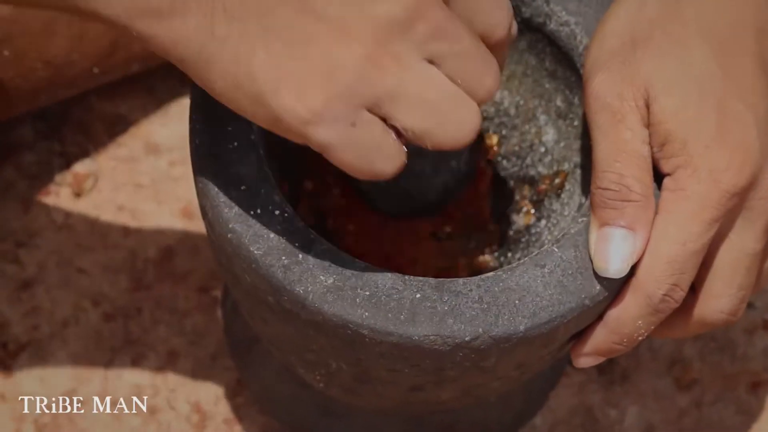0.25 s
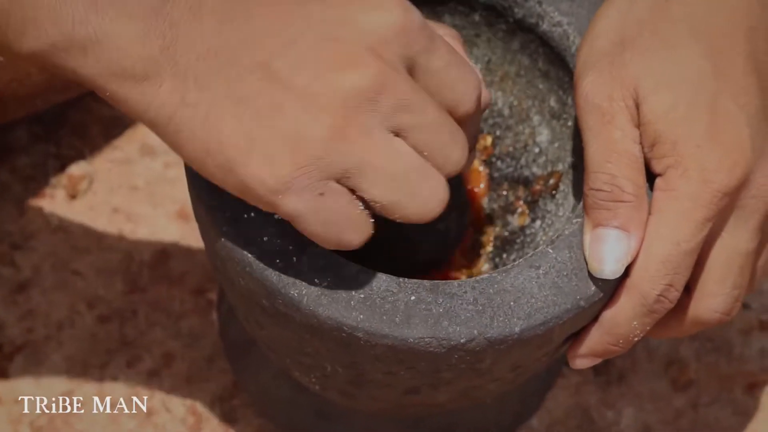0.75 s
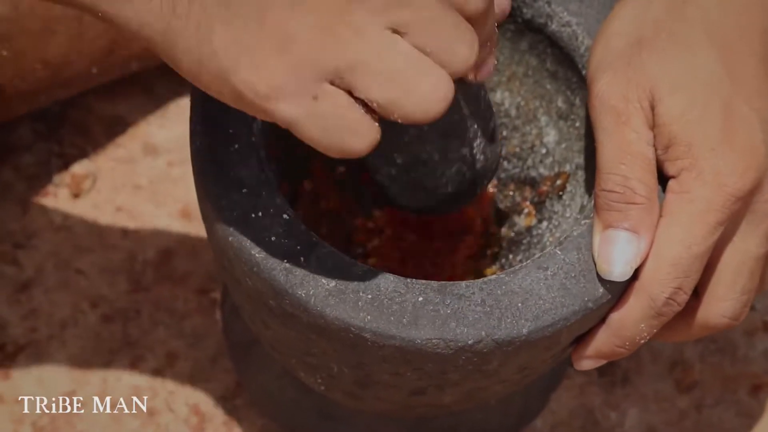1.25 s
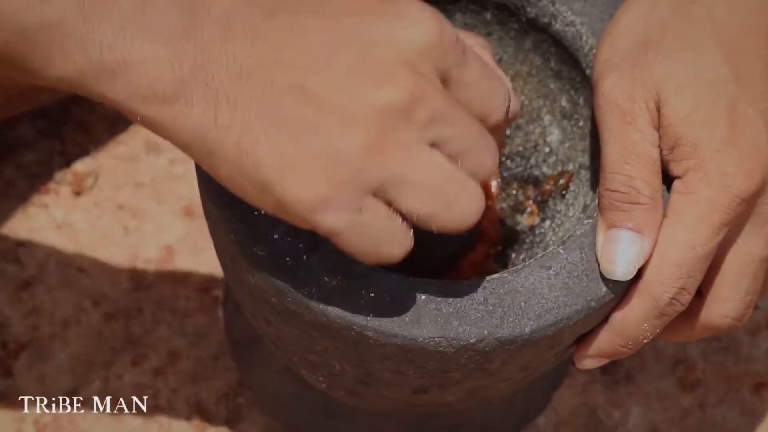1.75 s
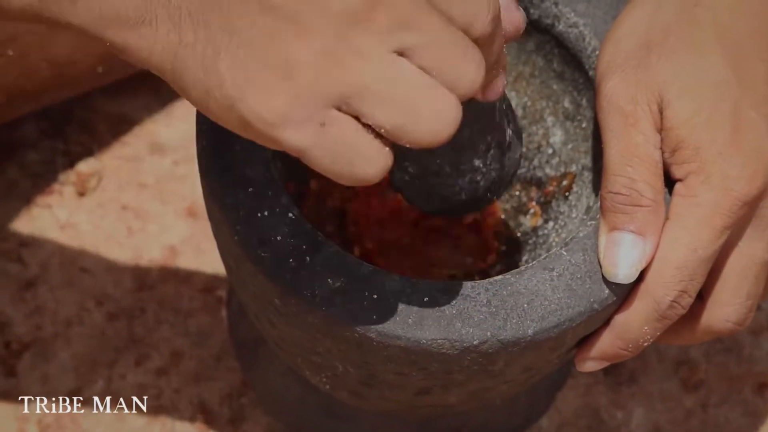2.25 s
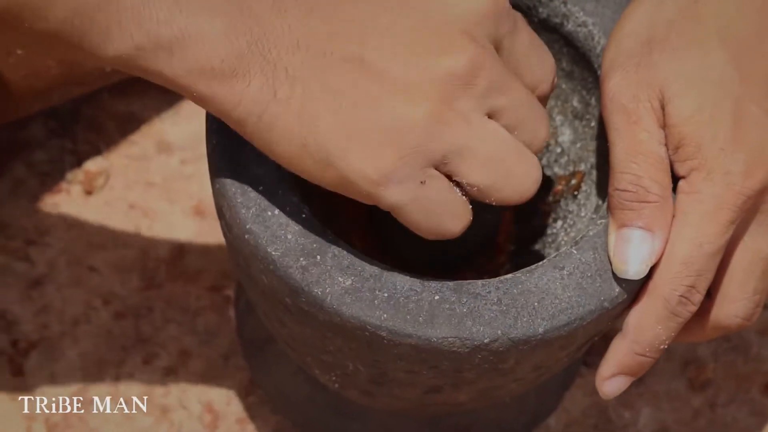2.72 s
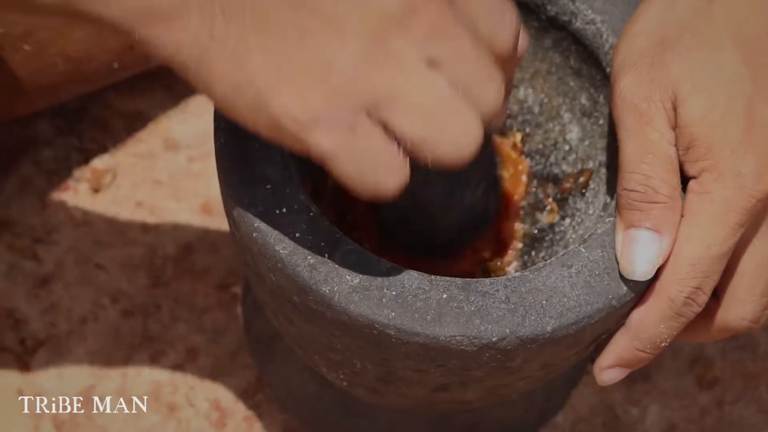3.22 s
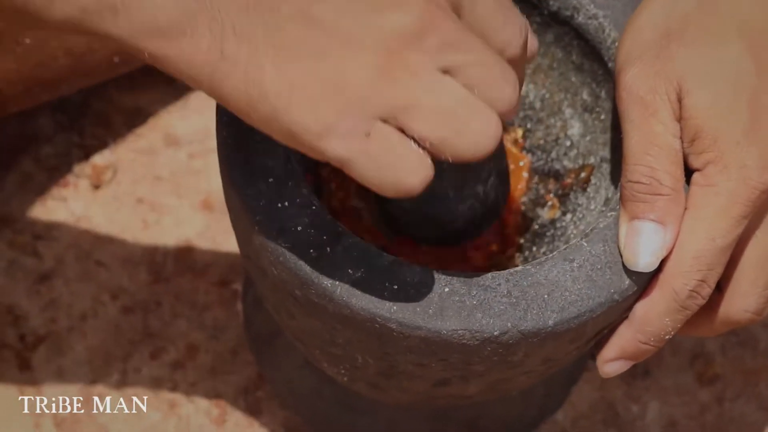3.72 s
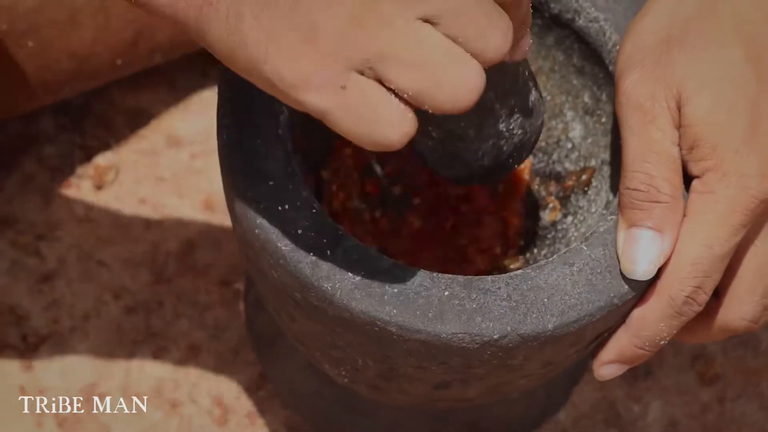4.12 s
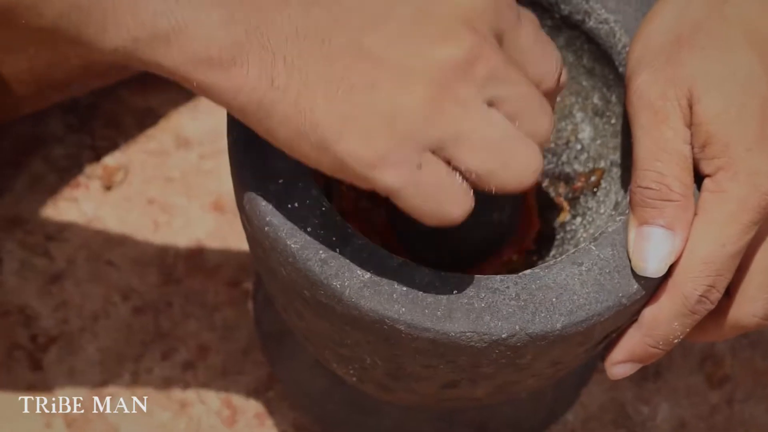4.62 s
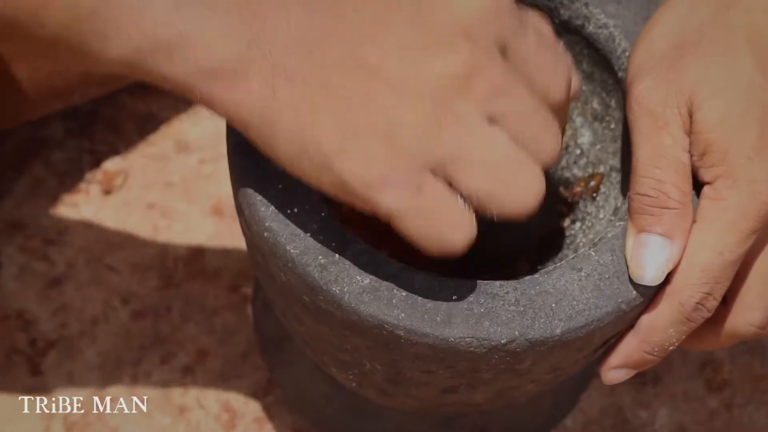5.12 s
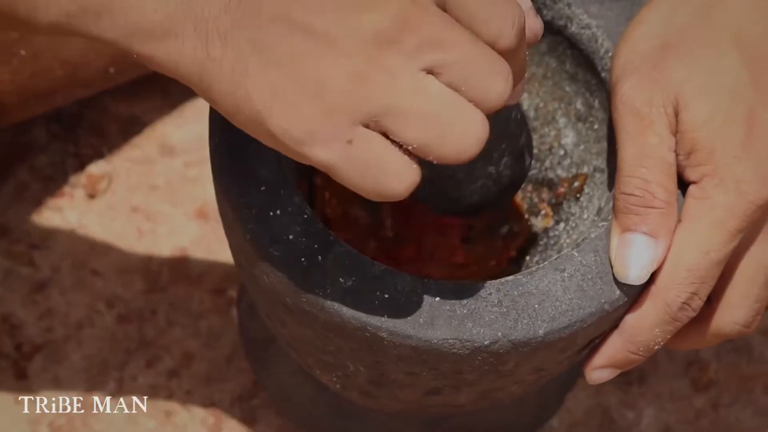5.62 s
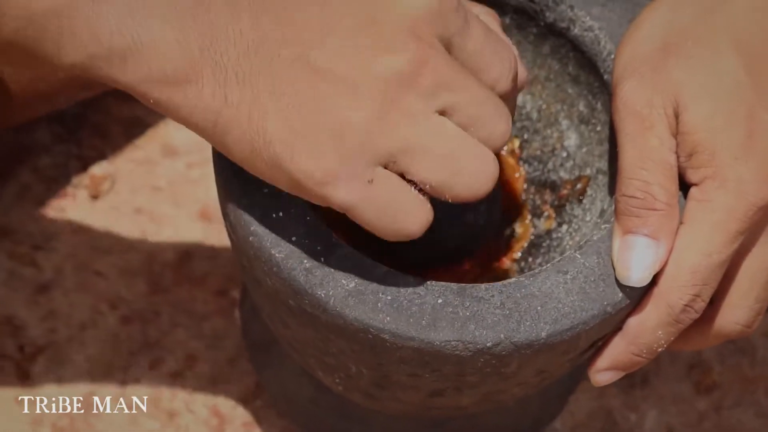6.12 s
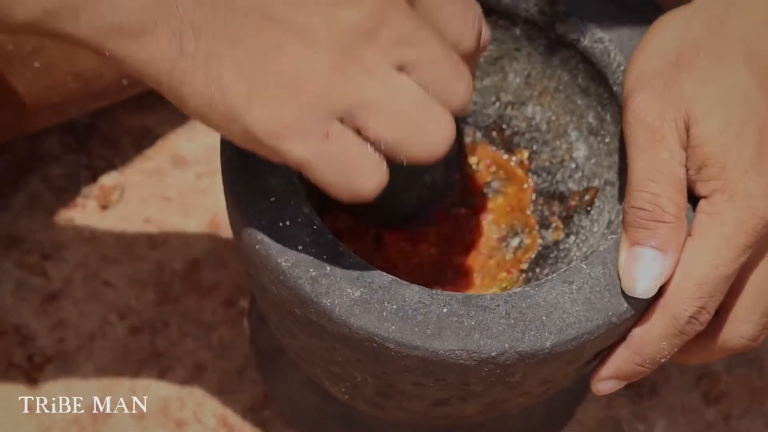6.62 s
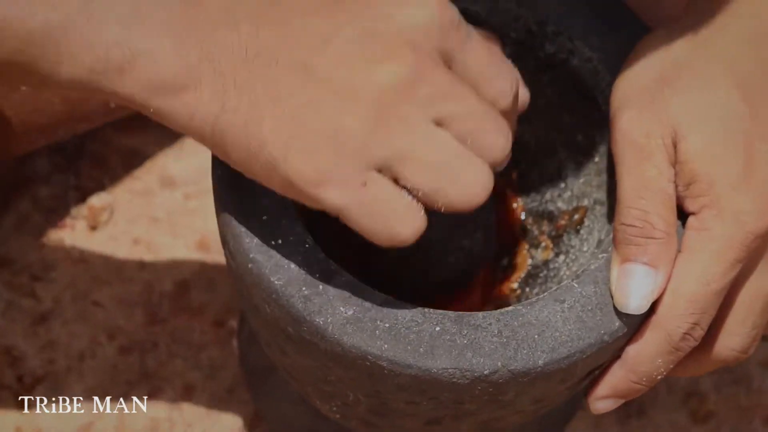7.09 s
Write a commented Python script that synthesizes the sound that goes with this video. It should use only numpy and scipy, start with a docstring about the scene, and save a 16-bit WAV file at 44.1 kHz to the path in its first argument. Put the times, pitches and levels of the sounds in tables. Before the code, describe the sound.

Very close to the microphone, a stone pestle pounds wet chilli paste in a stone mortar about three times a second. Short, dry, hollow knocks vary from sharp, slightly distorted clacks to muffled squelches, each followed by a faint wet suck. Grit cracks and tiny pops dot the rhythm. Outdoors, quiet insects and an airy wash sit far behind, with brief low wind buffets, strongest near five seconds. The last blows ring brighter.

```python
"""Stone mortar and pestle, outdoors

A stone pestle pounds wet chilli paste close to the microphone. Damped modes make the knock of the
bowl's air, wall and pestle; shaped noise makes squelch, grit, suck and pops. The hardest hits clip.
Noise bands sing as insects, swept sines whistle, and low noise buffets the two microphone ports."""
import sys
import numpy as np
from scipy import signal
from scipy.fft import rfft, irfft
from scipy.io import wavfile

SR = 44100
rng = np.random.default_rng(int(sys.argv[2]) if len(sys.argv) > 2 else 0)


def int16_out(signal):
    """Quantize to a 16-bit WAV file."""
    q = np.round(np.clip(np.atleast_2d(signal).T, -1, 1) * 32767)
    wavfile.write(sys.argv[1], SR, q.astype(np.int16))


N = 324135
TIME_S = np.arange(N) / SR
FREQ_HZ = np.fft.rfftfreq(N, 1 / SR)

# blows: (time [s], hollow knock [dB], wall clack [dB], pestle ring [dB], grit crack [dB, relative],
# paste under the pestle [dB above usual], squelch length [s], delay to the pestle's lift [s])
BLOWS = [(0.172, -24.5, -32, -41, -25.5, -1, .017, 0.087), (0.4668, -8, -10.5, -46, -21.5, 0, 0.026, 0.088),
         (0.7948, -0.5, 2.5, -29, -9, -4.5, 0.0052, .079), (1.1032, -8.5, 2.5, -19, -17, -4, .026, 0.085),
         (1.4201, -22, -23, -41, -21.5, -2.5, 0.021, 0.084),
         (1.7623, -14.5, -1, -39, -10.5, -25, .013, 0.072),
         (2.082, -34, -26, -33, -28.5, 1.5, 0.021, 0.081), (2.4094, -4.5, 6, -15.5, -12.5, 0, 0.02, 0.087),
         (2.728, -27.5, -18.5, -52, -22, 0, 0.012, 0.1), (3.039, -18.5, -36, -28, -21, 5, 0.014, 0.077),
         (3.3483, -5, -11.5, -51, -22, 0.5, 0.015, 0.074),
         (3.6482, -7, -9, -45.5, -24.5, -1.5, 0.022, 0.09),
         (3.9658, -4, -7.5, -25, -24.5, -3, 0.023, 0.076), (4.274, -7.5, -7.5, -45, -13.5, -1, .027, 0.082),
         (4.592, -34, -24, -50.5, -29, -1.5, 0.0094, .1), (4.923, -20, -30, -39, -28.5, 2.5, 0.021, 0.083),
         (5.2138, -25, -40, -49, -33, 1.5, 0.017, 0.09),
         (5.5158, -19, -26.5, -36, -23.5, -0.5, 0.022, 0.091),
         (5.8173, -12.5, -16, -50, -17.5, -5, 0.013, 0.081),
         (6.1167, -3.5, 7.5, -5.5, -13.5, -1.5, 0.048, .1), (6.4304, -9, 3.5, -12, -12.5, 0.5, 0.055, 0.12),
         (6.7307, -11, 3, -10.5, -25.5, -2.5, 0.053, .12), (7.0411, -11, -7, -28.5, -26.5, 3, .047, 0.1)]
# modes of the air in the bowl: (frequency [Hz], level [dB], t60 [s])
HOLLOW_MODES = [(382, -10.5, 0.0093), (500, -11.5, 0.014), (700, -1, 0.011), (761, 3, 0.021),
                (930, -10, .015), (1388, -13, 0.014)]
# modes of the stone wall: (multiple of the wall pitch [1], level [dB], t60 [s])
WALL_MODES = [(.57, -9.5, 0.015), (.94, -5.5, 0.014), (1.03, 2.5, 0.008), (1.17, -7, 0.013),
              (1.5, -17.5, 0.011)]
# modes of the pestle: (frequency [Hz], level [dB], t60 [s])
PESTLE_MODES = [(3322, 1.5, .034), (3367, -12.5, .046), (3380, -36.5, .4), (4950, -16.5, .031),
                (6440, -12.5, .016)]
# larger pops, bubbles bursting and seeds cracking: (time [s], relative peak [dB], centre [Hz])
POPS = [(0.8719, -16, 4840), (1.4183, -5, 8500), (1.7607, -4, 6000), (1.8186, -14, 3030),
        (2.7313, -14, 6600), (3.126, -22, 2780), (3.7234, -16, 3170), (4.0324, -22, 3400),
        (4.592, -9.5, 8600), (5.005, -23, 3440), (6.194, -18.5, 6530), (6.212, -23, 3200),
        (6.4727, -19.5, 3270), (6.5288, -15.5, 3440), (7.1451, -17, 3370)]
# gusts on the microphone: (start [s], length [s], level [dB], lower edge [Hz], left minus right [dB])
GUSTS = [(2.147, 0.054, -40.5, 60, 17.5), (2.469, 0.056, -40.5, 65, 20), (3.055, 0.039, -40, 50, -11),
         (4.474, 0.043, -40.5, 54.4, -8.5), (4.795, 0.032, -27, 54.5, -15), (4.873, 0.1, -19.5, 48, -21),
         (5.016, 0.041, -29, 130, 5.5), (5.112, 0.17, -32, 111, 6), (5.65, 0.091, -37.5, 150, 7),
         (5.984, 0.019, -35.5, 150, 2), (7.288, 0.066, -47.5, 59.5, 9)]
# steady breeze: (time [s], relative level [dB])
BREEZE = [(0, -52), (4.2, -52), (5.2, -49), (5.32, -61), (7.35, -61)]
# whistles arching in pitch: (middle [s], length [s], top [Hz], relative level [dB])
WHISTLES = [(0.113, .085, 12300, -56), (0.352, 0.26, 13900, -62.5), (1.6, .13, 12900, -58),
            (4.8, .19, 13960, -62.5), (5.744, .065, 1460, -49), (6.675, 0.11, 12300, -58)]
# spectrum of paste squeezed out: (frequency [Hz], relative density [dB/Hz])
SQUELCH_SPECTRUM = [(200, -8), (700, 6.5), (1300, -1), (2000, 0.5), (3000, 3), (4500, -1), (7000, 1.5),
                    (11000, -5), (13000, -7.5), (16000, -15.5)]
# spectrum of the lifting pestle's suck: (frequency [Hz], relative density [dB/Hz])
SUCK_SPECTRUM = [(300, -22.5), (1300, -6.5), (2000, -6), (2900, -4.5), (4500, -3.5), (7000, -4),
                 (11000, -11), (16000, -20.5)]
# spectrum of cracking grit: (frequency [Hz], relative density [dB/Hz])
GRIT_SPECTRUM = [(300, -20), (1200, -9), (2800, 0.5), (4500, 0), (6800, 2), (10500, -3.5), (13000, -7),
                 (16000, -12)]
# spectrum of the breeze at the ports: (frequency [Hz], relative density [dB/Hz])
RUMBLE_SPECTRUM = [(15, -22), (40, -10.5), (75, 2.5), (120, -6), (200, -8.5), (500, -15.5), (1500, -45.5)]
# spectrum of the distant wash: (frequency [Hz], relative density [dB/Hz])
AIR_SPECTRUM = [(30, -25), (120, -16.5), (200, -6.5), (310, -5), (500, -4), (1000, -5), (2000, -10.5),
                (4000, -13.5), (7000, -17.5), (11000, -20.5), (16000, -31)]
# level balance of the microphone ports: (frequency [Hz], left minus right [dB])
PORT_BALANCE = [(300, 1), (700, 0), (1290, 1.6), (2380, -5), (4400, 0), (8120, -1), (15000, -2.9)]
# phase between the microphone ports: (frequency [Hz], left's lead [rad])
PORT_PHASE = [(0, 0), (1380, -0.13), (2070, -0.66), (3450, 0.075), (4820, -0.81), (8000, -.05), (16000, 0)]

EDGE_HZ = 16200
# wall pitch, and its rise when the pestle rings at 0 dB on bare stone
WALL_HZ, BARE_RISE_HZ = 1789, 202
# the same paste squeezed out over twice the time squelches weaker by a fixed step
SQUELCH_DB, TYPICAL_SQUELCH_S, DB_PER_DOUBLING = -31.5, 0.018, -5.5
# worked paste grows stickier, so the suck grows louder
SUCK_DB, STICKIER_DB_PER_S = -49.5, 0.85
# smaller, higher pops just after each large one
SMALL_BUBBLES, SMALL_DB, SMALL_OCTAVES_UP, SMALL_SPREAD_S = 3, -12.5, 0.22, 0.0087
# a gust hits at once, sags, then lets go quickly
GUST_RISE_S, GUST_FALL_S, GUST_SAG_DB = 0.004, 0.014, -6
GUST_WIDTH_HZ, WIDTH_DOUBLES_DB, TYPICAL_GUST_DB = 115, 16.5, -32.5


def gain_of(db):
    """Decibels to an amplitude factor."""
    return 10 ** (np.asarray(db) / 20)


def evened(x):
    """Scales x to rms 1."""
    return x / np.sqrt(np.mean(x ** 2) + 1e-20)


def read(points, hz):
    """Interpolates a spectrum table on a log-frequency axis."""
    f, value = np.transpose(points)
    return np.interp(np.log(hz + 1), np.log(f + 1), value)


def add(mix, s, sound):
    """Adds a sound to the mix in place from time s."""
    part = mix[max(round(s * SR), 0):][:len(sound)]
    part += sound[:len(part)]


def coloured(x, points):
    """Filters x by a spectrum table, to rms 1."""
    return evened(irfft(rfft(x) * gain_of(read(points, FREQ_HZ)), N))


def noise_pair(likeness):
    """White noise in two channels of the given correlation."""
    left, other = rng.standard_normal((2, N))
    c = np.clip(likeness, -1, 1)
    return np.array([left, c * left + np.sqrt(1 - c ** 2) * other])


def band(x, hz, width_hz):
    """Gaussian band of x, at rms 1."""
    bell = np.exp(-0.5 * ((FREQ_HZ - hz) / width_hz) ** 2)
    return evened(irfft(rfft(x) * bell, N))


def wander(rate_hz):
    """Low-passed random drift, at rms 1."""
    return band(rng.standard_normal(N), 0, rate_hz)


def outdoors(air_db=-55, patchy_db=1, drone_db=-66, cricket_db=-67, second_db=-70.5):
    """Distant wash, steady insect drone and crickets in broken bursts, all as filtered noise."""
    air = gain_of(air_db + patchy_db * wander(15)) * coloured(noise_pair(0.43), AIR_SPECTRUM)
    drone = gain_of(drone_db) * band(noise_pair(0.3), hz=5300, width_hz=190)
    bursts = (1 + np.tanh(3 * wander(7))) / 2
    cricket = gain_of(cricket_db) * bursts * band(noise_pair(0.4), hz=8930, width_hz=90)
    # a lower cricket fills the gaps for a while
    answering = np.exp(-((TIME_S - 5.6) / 0.72) ** 2) * (1 - bursts)
    second = gain_of(second_db) * answering * band(noise_pair(0.4), hz=8400, width_hz=96)
    return air + drone + cricket + second


def whistles(level_db=-5, droop=0.13):
    """Thin, trembling calls: sines whose pitch and level rise and fall."""
    out = np.zeros(N)
    tremble = 1 + 0.013 * wander(250)
    for s, length_s, top_hz, db in WHISTLES:
        u = np.clip((TIME_S - s) / length_s * 2, -1, 1)
        # droop is the fractional fall at the ends of a 0.16 s call
        hz = top_hz * (1 - droop * (u * length_s / 0.16) ** 2) * tremble
        tone = np.sin(2 * np.pi * np.cumsum(hz) / SR)
        out += gain_of(db + level_db) * np.sqrt(1 - u ** 2) * tone
    return out * gain_of(3 * wander(40))


def wind(breeze_db=1, gust_db=0, lumpy_db=2.5, apart=1.13):
    """Low turbulence at each port: a breeze and lumpy gusts, reaching higher the stronger they are."""
    breeze_level_db = np.interp(TIME_S, *np.transpose(BREEZE)) + breeze_db
    out = coloured(noise_pair(0.77), RUMBLE_SPECTRUM) * gain_of(breeze_level_db)
    size, before_s = SR // 2, 0.1
    t = np.arange(size) / SR - before_s
    hz = np.fft.rfftfreq(size, 1 / SR)
    lumps = gain_of(lumpy_db * wander(30))
    noise = rng.standard_normal((len(GUSTS), 3, size))
    for (s, length_s, db, low_hz, pan_db), (shared, *own) in zip(GUSTS, noise):
        top_hz = low_hz + GUST_WIDTH_HZ * 2 ** ((db - TYPICAL_GUST_DB) / WIDTH_DOUBLES_DB)
        colour = hz ** 2 / (hz ** 2 + low_hz ** 2) / np.sqrt(1 + (hz / top_hz) ** 7)
        edges = (1 + np.tanh(t / GUST_RISE_S)) * (1 - np.tanh((t - length_s) / GUST_FALL_S))
        shape = edges * gain_of(GUST_SAG_DB * np.clip(t / length_s, 0, 1))
        turbulence = irfft(rfft(shared + apart * np.array(own)) * colour, size)
        puff = turbulence * shape * np.interp(s + t, TIME_S, lumps)
        # equal energy per port before panning
        puff *= gain_of(db + gust_db) * np.sqrt(length_s * SR / (puff ** 2).sum(1, keepdims=True))
        shares = evened(gain_of([pan_db / 2, -pan_db / 2]))
        for port, sound, share in zip(out, puff, shares):
            add(port, s - before_s, share * sound)
    return out


def flutter(start_s=5.53, end_s=6.05, level_db=-47, lumpy_db=6.5, hz=200, width_hz=85):
    """After the big gusts the air keeps fluttering at the microphone: lumpy band noise."""
    spell = (np.tanh((TIME_S - start_s) / GUST_RISE_S) - np.tanh((TIME_S - end_s) / GUST_FALL_S)) / 2
    lumpy = band(noise_pair(0.78), hz, width_hz) * gain_of(lumpy_db * wander(22))
    return gain_of(level_db) * spell * evened(lumpy)


def yard(x, near_db=-30, near_t60_s=0.055, far_db=-37, far_t60_s=0.6):
    """Weak scattered echoes, from the ground and from farther things, as decaying noise tails."""
    t = np.arange(SR // 2) / SR
    near, far = rng.standard_normal((2, 2, len(t))) * np.clip(t / 0.0046 - 1, 0, 1)
    near = near * np.exp(-np.log(1000) * t / near_t60_s)
    far = far * np.exp(-np.log(1000) * t / far_t60_s)
    tail = gain_of(near_db) * near / np.linalg.norm(near[0])
    tail = tail + gain_of(far_db) * far / np.linalg.norm(far[0])
    echoes = signal.fftconvolve(x[None], tail, axes=1)[:, :N]
    # (frequency [Hz], gain [dB])
    colour = [(300, 4.5), (800, 6.5), (2000, -1.5), (3300, 10.5), (5000, 9.0), (14000, -8.5)]
    return irfft(rfft(echoes) * gain_of(read(colour, FREQ_HZ)), N)


def ports(x, glance_db=-9, left_s=0.000521, right_s=0.000696, rim_hz=2600):
    """Each port hears the mortar directly, plus its treble glancing off the rim by a longer path."""
    half = gain_of(read(PORT_BALANCE, FREQ_HZ) / 2) * np.exp(0.5j * read(PORT_PHASE, FREQ_HZ))
    treble = 1j * FREQ_HZ / (1j * FREQ_HZ + rim_hz)
    delays = np.exp(-2j * np.pi * np.outer([left_s, right_s], FREQ_HZ))
    glance = gain_of(glance_db) * treble * delays
    return irfft(rfft(x) * np.array([half, 1 / half]) * (1 + glance), N)


def pops(level_db=-3, fade_s=0.00061, octaves=0.3, scatter_db=3, scatter_octaves=0.28):
    """Bubbles and seeds snap: brief decaying noise bands, each round its own pitch."""
    every = list(POPS)
    for s, db, centre_hz in POPS:
        for late, size, high in rng.standard_normal((SMALL_BUBBLES, 3)):
            small_hz = centre_hz * 2 ** (SMALL_OCTAVES_UP + scatter_octaves * high)
            every.append((s + SMALL_SPREAD_S * abs(late), db + SMALL_DB + scatter_db * size, small_hz))
    out = np.zeros(N)
    t, hz = np.arange(1024) / SR, np.fft.rfftfreq(1024, 1 / SR)
    for s, db, centre_hz in every:
        grain = rfft(rng.standard_normal(len(t)))
        bell = np.exp(-0.5 * (np.log2((hz + 1) / centre_hz) / octaves) ** 2)
        snap = irfft(grain * bell) * np.exp(-t / fade_s)
        add(out, s, gain_of(db + level_db) * snap / abs(snap).max())
    return out


def paste(lead_s=0.0039, cushion=0.042, close_s=0.0047, snap_s=0.0002, grit_s=0.001, grit_db=4,
          swell_s=0.018, let_go_s=0.008, squelch_clump_db=2.5, suck_clump_db=2.5,
          gap_db=-4, gap_hz=2950, gap_fall_hz=1500):
    """Squeezed paste fizzes with tiny bubbles, grit cracks at contact, the lifting pestle sucks free."""
    squeeze, crack, suck, gap = np.zeros((4, N))
    before_s = 0.02
    t = np.arange(SR // 4) / SR - before_s
    for s, _, _, pestle_db, crack_db, paste_db, length_s, lift_s in BLOWS:
        # paste is met before stone; a ringing blow has hardly any paste under it
        lead = lead_s / (1 + gain_of(pestle_db) / cushion)
        pressing = (1 + np.tanh(3 * (t / lead + 1))) / 2 * (1 - np.tanh((t - length_s) / close_s)) / 2
        slowness_db = DB_PER_DOUBLING * np.log2(length_s / TYPICAL_SQUELCH_S)
        add(squeeze, s - before_s, gain_of(SQUELCH_DB + paste_db + slowness_db) * pressing)
        cracking = np.exp(-abs(t) / np.where(t < 0, snap_s + lead / 10, grit_s))
        add(crack, s - before_s, gain_of(crack_db + grit_db) * cracking)
        swell = np.exp(-0.5 * ((t - lift_s) / np.where(t < lift_s, swell_s, let_go_s)) ** 2)
        lifting = gain_of(SUCK_DB + STICKIER_DB_PER_S * s) * swell
        add(suck, s - before_s, lifting)
        # the air pocket under the pestle grows, so its resonance falls
        hz = gap_hz + gap_fall_hz * (1 - np.tanh((t - lift_s + 0.02) / 0.016)) / 2
        add(gap, s - before_s, lifting * np.sqrt(2) * np.cos(2 * np.pi * np.cumsum(hz) / SR))
    squelch_noise, grit_noise, suck_noise = rng.standard_normal((3, N))
    squelch_noise = squelch_noise * gain_of(squelch_clump_db * wander(490))
    suck_noise = suck_noise * gain_of(suck_clump_db * wander(600))
    return (squeeze * coloured(squelch_noise, SQUELCH_SPECTRUM)
            + crack * coloured(grit_noise, GRIT_SPECTRUM)
            + suck * coloured(suck_noise, SUCK_SPECTRUM)
            + gain_of(gap_db) * gap * wander(350))


def ringing(modes, chance, pitch=1, detune=0, scatter_db=0, contact_s=0.0003):
    """Decaying modes after one blow; where it lands shifts their pitch and strength."""
    t = np.arange(SR // 3) / SR
    hz, db, t60_s = np.transpose(modes)
    shift, size = chance[:, :len(hz)]
    tones = np.sin(2 * np.pi * np.outer(pitch * hz * (1 + detune * shift), t))
    rings = tones * np.exp(-np.log(1000) * t / t60_s[:, None])
    return gain_of(db + scatter_db * size) @ rings * (1 - np.exp(-t / contact_s))


def knocks(low_hz=290):
    """Each blow rings the air in the bowl, the stone wall and the pestle as damped modes."""
    hollow, stone = np.zeros((2, N))
    chances = rng.standard_normal((len(BLOWS), 3, 2, 8))
    for (s, hollow_db, wall_db, pestle_db, *_), chance in zip(BLOWS, chances):
        wall_hz = WALL_HZ + BARE_RISE_HZ * gain_of(pestle_db)
        air = ringing(HOLLOW_MODES, chance[0], detune=0.012, scatter_db=3.0, contact_s=0.00065)
        wall = ringing(WALL_MODES, chance[1], pitch=wall_hz, detune=0.038, scatter_db=3.5,
                       contact_s=0.00039)
        pestle = ringing(PESTLE_MODES, chance[2], scatter_db=3.5, contact_s=0.00026)
        add(hollow, s, gain_of(hollow_db) * air)
        add(stone, s, gain_of(wall_db) * wall)
        add(stone, s, gain_of(pestle_db) * pestle)
    # so small a bowl radiates little bass
    bass_cut = signal.butter(N=4, Wn=low_hz, btype="high", fs=SR, output="sos")
    return stone + signal.sosfilt(bass_cut, hollow)


def scene():
    """The mortar in its yard, with wind and insects."""
    mortar = knocks() + paste() + pops()
    return ports(mortar) + yard(mortar) + wind() + flutter() + outdoors() + whistles()


def record(dry):
    """The recorder clips at full scale, then low-passes."""
    clipped = np.clip(dry, -1, 1)
    lowpass = signal.firwin(255, EDGE_HZ, window=("kaiser", 8), fs=SR)
    return signal.oaconvolve(clipped, lowpass[None], "same")


dry = scene()
out = record(dry)
int16_out(out)
```